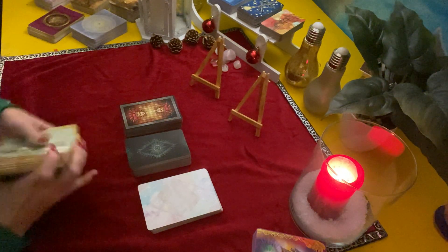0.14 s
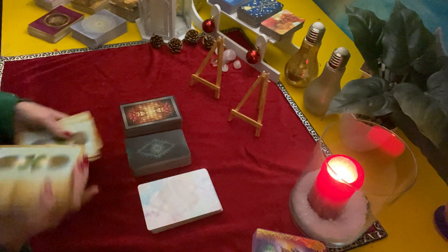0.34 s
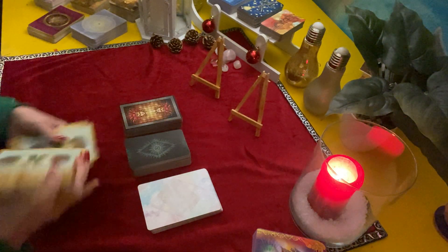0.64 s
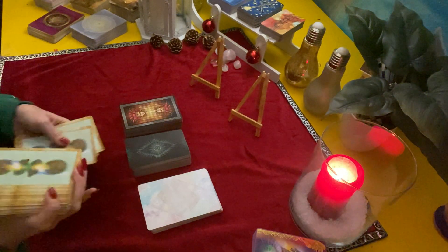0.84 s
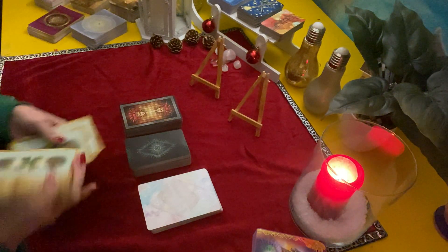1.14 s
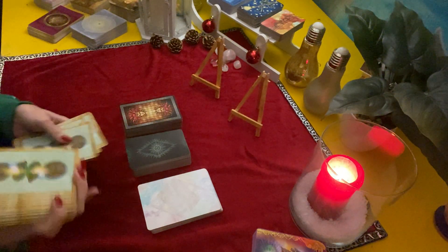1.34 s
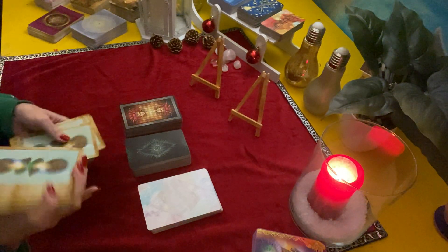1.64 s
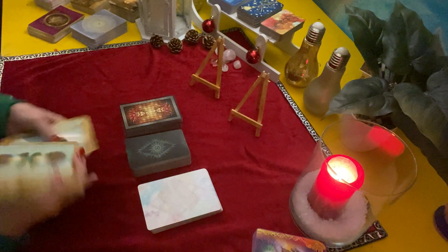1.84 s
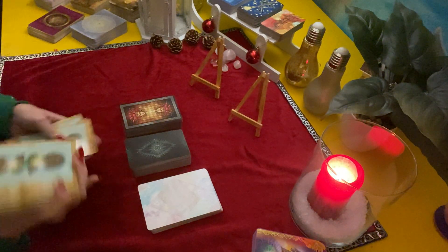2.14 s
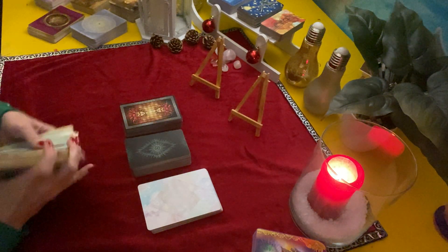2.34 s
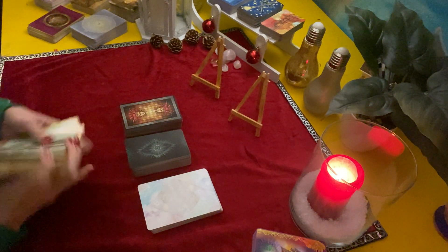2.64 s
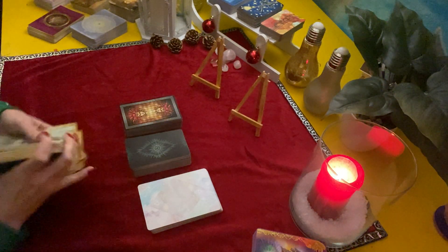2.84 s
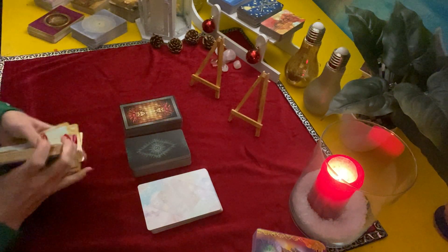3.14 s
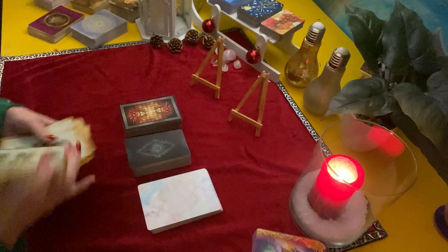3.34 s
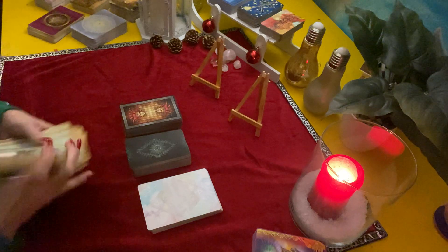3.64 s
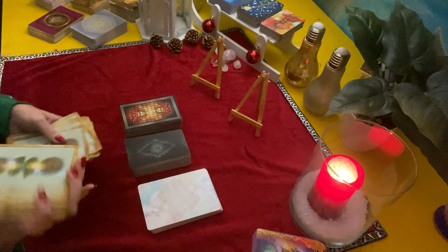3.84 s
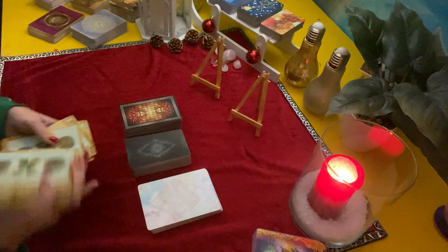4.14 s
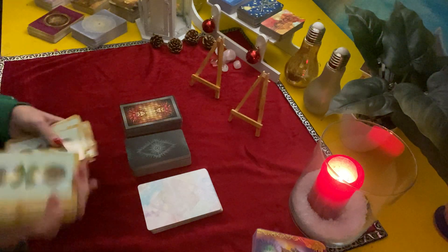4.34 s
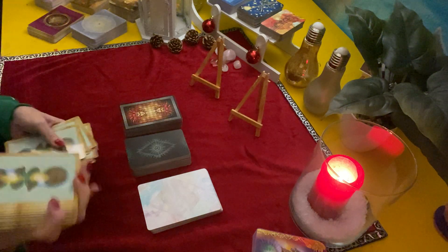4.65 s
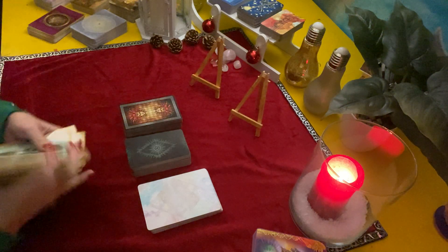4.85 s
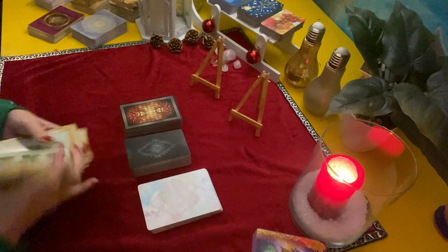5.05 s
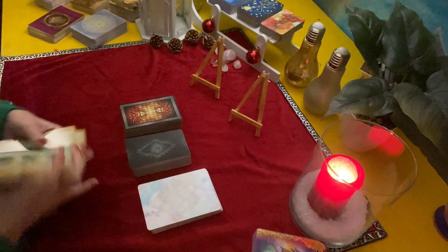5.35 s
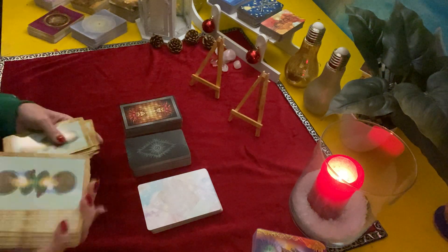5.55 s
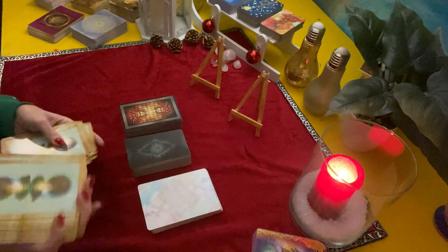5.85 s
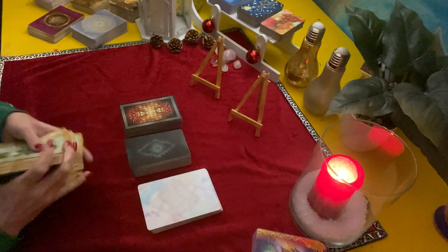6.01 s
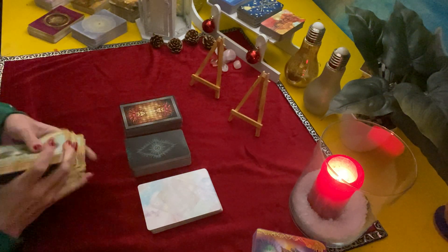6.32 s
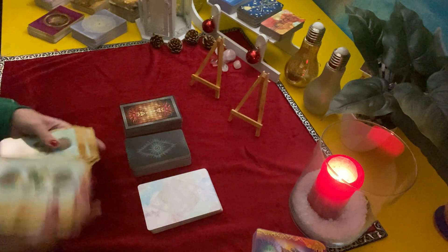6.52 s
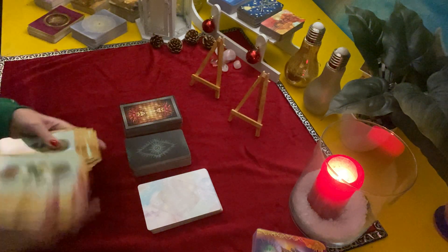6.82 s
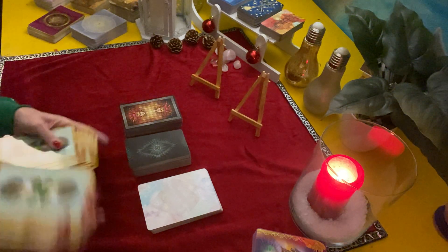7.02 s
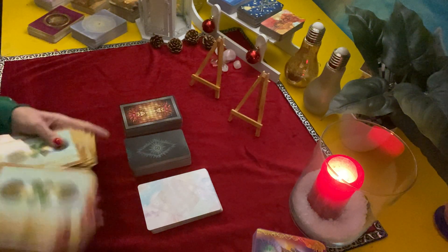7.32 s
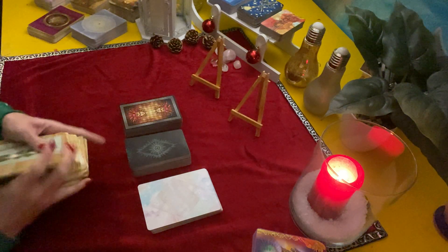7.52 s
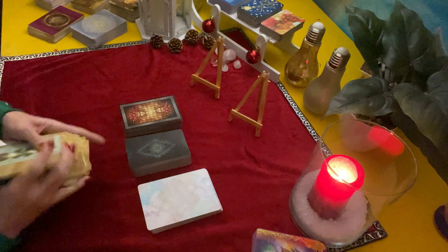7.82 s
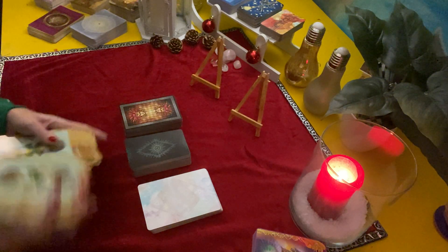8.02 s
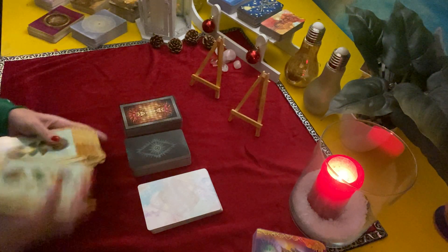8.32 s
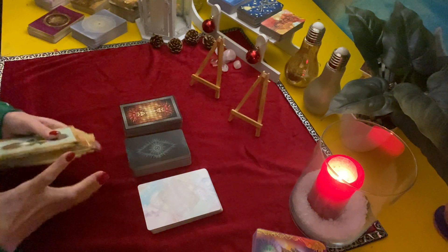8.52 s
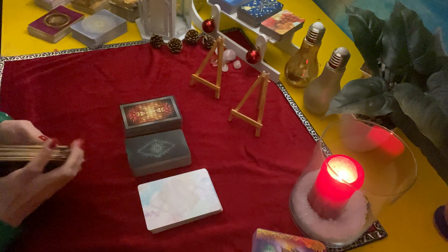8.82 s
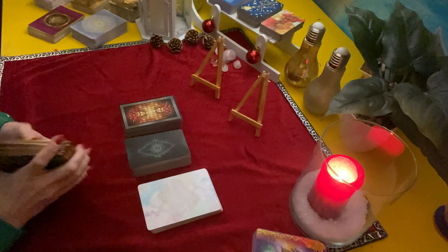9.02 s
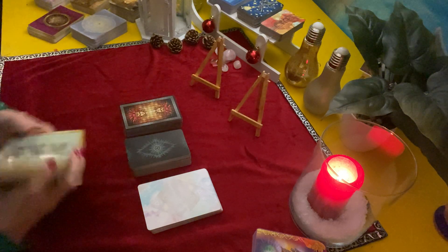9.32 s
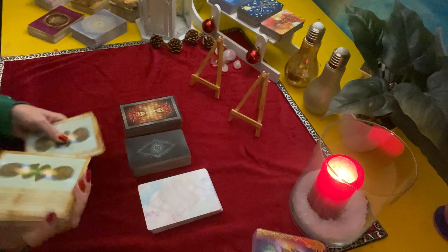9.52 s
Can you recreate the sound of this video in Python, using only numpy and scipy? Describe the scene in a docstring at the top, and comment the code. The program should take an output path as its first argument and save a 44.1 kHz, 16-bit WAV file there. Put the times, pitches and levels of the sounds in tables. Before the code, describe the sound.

From the very start, a deck of cards is shuffled overhand in a steady rhythm of about three and a half strokes a second. In each stroke a packet scrapes free, slides back, hisses in between the other cards and clacks home with a soft, low thump. The sharpest clacks come at around 1.7, 1.8 and 2.5 seconds. The rhythm carries on evenly, the thumps growing lighter from about 5.5 seconds. At around 8.5 seconds the shuffling stops, and fingers square up the deck with a few quiet rubs along its edges. At about 9.2 seconds it resumes with a couple more crisp strokes, lasting to roughly 9.6 seconds. The cards sound close and in stereo, with the short echoes of a small room over a very faint bed of rumble, hiss and electrical hum.

```python
"""A small live room, a cloth-covered table: a deck of cards is shuffled overhand, about three and a half
strokes a second. In each stroke a packet scrapes free, slides back, hisses in between the other cards
and clacks home with a soft, low thump. Near the end fingers square up the deck with a soft rub.
Two microphone ports hear the cards and their echoes over a faint bed of rumble, hiss and mains hum."""
import sys
import numpy as np
from scipy import signal
from scipy.fft import rfft, irfft, next_fast_len
from scipy.io import wavfile
from scipy.ndimage import map_coordinates

SR = 44100
rng = np.random.default_rng(int(sys.argv[2]) if len(sys.argv) > 2 else 0)


def wrap_up_sound(samples):
    """Save the sound to the file named by the first command line argument, as 16-bit audio."""
    columns = np.atleast_2d(samples).T
    # keep every value between -1 and 1, then stretch to whole-number steps
    tamed = np.clip(columns, -1, 1)
    steps = np.round(tamed * 32767).astype(np.int16)
    wavfile.write(sys.argv[1], SR, steps)


N = 426447
T = np.arange(SR // 7) / SR  # seconds within one event

# Colours of the bed. Each row: frequency in Hz, relative level in dB.
RUMBLE_COLOUR = [(20, -22.5), (35, -1.5), (50, 5.5), (70, -20.5), (100, -7), (160, -30.5), (350, -29.5),
                 (1000, -40), (4000, -57.5)]
HISS_COLOUR = [(100, 0.5), (400, -4), (1000, -10.5), (1600, -2.5), (4000, -10.5), (8000, -9.5),
               (12000, -19), (16000, -14.5)]
# The room's decay. Each row: frequency in Hz, seconds to fall by 60 dB.
ROOM_DECAY = [(70, 0.44), (250, 0.26), (700, 0.29), (2000, 0.2544), (3500, 0.25), (6000, 0.29),
              (10000, 0.22), (15000, 0.18)]
# The room's tone. Each row: frequency in Hz, level in dB against the direct sound.
ROOM_COLOUR = [(60, -4), (170, -5.5), (330, -3), (500, -0.5), (900, -0.5), (1500, -8.5), (2400, -5.5),
               (3100, -5.5), (3900, -7.5), (5000, -8.5), (7000, -11), (11000, -7.5), (15000, -15)]
# Echoes off the table and the wall behind the cards. Each row: frequency in Hz, share from 0 to 1.
FRONTAL_SHARE = [(80, 0.7), (300, 0.68), (900, 0), (2000, 0.31), (3700, 0), (8000, 1)]
# The cards reach the left port first. Each row: frequency in Hz, phase lead in radians.
LEFT_LEAD = [(0, 0), (340, .1), (600, 1.0), (1150, .5), (1700, 1.4), (2400, 2.5), (3600, 3.2), (5000, 3.7),
             (6200, 5.3), (8200, 6.4), (10450, 9.4), (13000, 12.6), (15600, 15.7)]
# Moving hands bend the path to the ports. Each row: frequency in Hz, scatter of the lead in radians.
LEAD_SCATTER = [(200, .05), (600, 1.4), (1300, 0.2), (2400, 1.3), (3700, 1.55), (5200, 1.8), (8000, 0.1),
                (15000, .3)]
# The microphone's bass roll-off. Each row: frequency in Hz, gain in dB.
MIC_LOW_CUT = [(20, -15.5), (33, -12.5), (46, 0)]
# Balance of the ports. Each row: frequency in Hz, left minus right in dB.
MIC_BALANCE = [(100, -2), (1500, -1.5), (5000, -.8), (14000, -.1)]

# Colours of paper rubbing on paper. Each row: frequency in Hz, relative level in dB.
SCRAPE_COLOUR = [(60, -27.5), (160, -10), (330, -1), (750, -5.5), (1080, -8), (1600, 3), (2100, -4.5),
                 (3000, -8.5), (5000, -12.5), (15000, -38)]
EDGE_COLOUR = [(800, -38), (2500, 2), (4500, 0.5), (7000, 1), (10000, -4), (15500, -3.5)]
SLIDE_COLOUR = [(150, -13), (450, -5), (1500, 0.5), (3500, 0), (7000, -1.5), (11000, -6.5), (15500, -6)]
SWISH_COLOUR = [(60, -20.5), (150, -12), (500, -2), (1300, -11), (2400, -6), (3800, -9.5), (5500, -2.5),
                (7500, -0.5), (11000, 1), (15500, 6.5)]
SETTLE_COLOUR = [(60, -28.5), (160, -6.5), (380, 1.5), (800, -3), (1500, -1), (3000, -6.5), (6000, -9),
                 (10000, -23.5), (15000, -28.5)]
# Colours of a clack in the stack, faces and edge. Each row: frequency in Hz, relative level in dB.
KNOCK_COLOUR = [(40, -21.5), (130, -11.5), (250, 0), (430, 3), (600, -3.5), (850, 3), (1200, -15),
                (3000, -35)]
CRACK_COLOUR = [(100, -53), (500, -12), (900, -14), (1400, 3.5), (2400, 1), (3600, -6), (6000, -25)]
SNAP_COLOUR = [(300, -43), (1500, -13), (3600, 4.5), (6000, 2), (8500, -0.5), (11000, -5), (15500, -6.5)]
# Fingers square up the deck. Each row: start in seconds, length in seconds, rub in dB, edge hiss in dB.
SQUARING_RUBS = [(8.681, 0.14, -61.5, -58), (8.897, 0.14, -73, -63), (9.11, 0.22, -69.5, -61.5),
                 (9.179, 0.039, -54.5, -49.5)]
# A packet is drawn out. Each row: start in seconds, scrape level in dB, scrape length in seconds.
PACKET_DRAWS = [(0.193, -37, 0.013), (0.47, -37.5, 0.022), (0.744, -43, 0.032), (1.015, -40.5, 0.018),
                (1.29, -44.5, 0.02), (1.557, -43.5, 0.024), (1.812, -44.5, 0.015), (2.093, -46.5, 0.046),
                (2.375, -40, 0.011), (2.643, -37, 0.021), (2.902, -35.5, .032), (3.188, -41.5, 0.025),
                (3.473, -38, 0.031), (3.756, -42, 0.019), (4.021, -37, 0.031), (4.293, -43.5, 0.024),
                (4.567, -45.5, .032), (4.851, -42.5, .035), (5.145, -41, 0.031), (5.446, -44.5, 0.012),
                (5.742, -40.5, 0.038), (6.064, -38.5, 0.018), (6.362, -42.5, 0.038), (6.66, -38.5, .015),
                (6.943, -43, .036), (7.255, -37, 0.023), (7.55, -47, .039), (7.845, -42.5, .035),
                (8.14, -43, .038), (8.431, -42.5, 0.062), (9.391, -37, .031)]
# A packet drops in. Each row: start in seconds, swish in dB, swish length in seconds, rustle in dB.
PACKET_DROPS = [(-0.001, -28.5, 0.016, -31.5), (0.291, -23.5, 0.018, -37), (0.553, -28.5, 0.018, -32),
                (0.837, -25.5, 0.028, -41.5), (1.106, -29, 0.023, -31), (1.38, -22.5, 0.018, -46.5),
                (1.653, -26, .022, -34), (1.918, -25, 0.017, -31), (2.192, -23.5, 0.019, -44),
                (2.468, -26.5, 0.024, -30), (2.761, -24.5, 0.013, -40.5), (3.031, -35, 0.016, -45),
                (3.285, -21, 0.018, -38), (3.566, -26.5, .017, -37.5), (3.851, -26.5, .017, -36.5),
                (4.114, -29, 0.011, -39.5), (4.388, -23.5, 0.011, -35), (4.666, -24, 0.016, -33),
                (4.955, -29, 0.012, -45.5), (5.247, -33, 0.012, -30.5), (5.56, -19, .014, -38.5),
                (5.866, -26, .026, -46.5), (6.169, -32.5, 0.018, -52), (6.462, -32, .013, -43.5),
                (6.771, -20.5, 0.0082, -41.5), (7.065, -27.5, 0.012, -41.5), (7.373, -29.5, 0.013, -42),
                (7.662, -33.5, .018, -39.5), (7.969, -26, 0.011, -42.5), (8.243, -49, .028, -46),
                (9.243, -27, 0.016, -37.5), (9.509, -31.5, .012, -33)]
# The low thump under each drop, easing off until the pause. Each row: time in seconds, level in dB.
THUMP_LEVEL = [(0, -38), (2.3, -40.5), (4.1, -39.5), (5.5, -43), (6.1, -47), (7.4, -43.5), (7.7, -51),
               (8.3, -59), (9.2, -44), (9.6, -34)]
# Cards strike the deck. Each row: start in seconds, strength in dB, ring pitch in Hz, tilt from 0 to 1.
CARD_HITS = [(0.0322, -27, 2250, 0.72), (0.201, -33.5, 1596, .5), (0.307, -37, 655, 0),
             (0.3173, -32.5, 2740, .95), (0.474, -38.5, 1770, 0.6), (0.5734, -31.5, 784, 0.1),
             (0.5833, -37.5, 665, .95), (0.748, -27.5, 1700, 0.3), (0.8762, -31.5, 2650, .95),
             (1.0193, -41.5, 2180, 0.8), (1.1297, -35, 2700, .05), (1.1434, -28.5, 1650, .6),
             (1.4032, -38, 573, .05), (1.4116, -29.5, 2200, 0.8), (1.6862, -20.5, 2006, .6),
             (1.8252, -18.5, 1510, .5), (1.8305, -28, 1430, 0.28), (1.9521, -31.5, 2350, .85),
             (2.1, -39, 1710, 0.7), (2.1059, -35.5, 1730, 0.2), (2.2208, -28.5, 890, 0.42),
             (2.4095, -45.5, 1450, .55), (2.4999, -18.5, 2360, 0.8), (2.6495, -33, 1470, 0.1),
             (2.6716, -31, 1380, .7), (2.7741, -36, 2620, 0.7), (2.7869, -35, 1540, 0.04),
             (2.9079, -28, 1430, .85), (2.9398, -34.5, 1440, 0.5), (3.0421, -36, 2300, .95),
             (3.059, -28, 890, 0.5), (3.2019, -38.5, 1440, 0.6), (3.311, -48, 1150, .95),
             (3.4836, -34, 1440, 0.1), (3.4982, -44, 1460, .95), (3.5838, -39.5, 2280, 0),
             (3.5971, -33, 680, 0.8), (3.7624, -34, 1380, .55), (3.8666, -32.5, 2500, .05),
             (3.8815, -33, 2600, .95), (4.0352, -32, 1470, .65), (4.1307, -31, 2330, .05),
             (4.1437, -33, 2400, .95), (4.3174, -36.5, 2960, 0.7), (4.3953, -34.5, 2280, .95),
             (4.4157, -35, 650, 0.4), (4.5692, -42, 646, .1), (4.6853, -32.5, 615, .05),
             (4.8624, -42, 1460, 0.6), (4.9683, -31.5, 612, .05), (5.264, -35, 2170, 0.16),
             (5.273, -39, 783, .95), (5.4641, -35.5, 1630, .7), (5.566, -50.5, 2430, 0),
             (5.581, -36.5, 686, 0.8), (5.7688, -38.5, 1520, 0.5), (5.9055, -44, 666, .05),
             (6.045, -49, 2490, 1), (6.181, -37, 2600, 0.6), (6.1962, -41.5, 800, .75),
             (6.3738, -35, 1660, 0.6), (6.3886, -36.5, 1470, 0.6), (6.472, -38, 640, 1),
             (6.6691, -32, 1760, .48), (6.9504, -32.5, 1710, 0.6), (7.0804, -45, 640, .95),
             (7.26, -32.5, 1740, .48), (7.411, -40, 2660, .8), (7.5587, -41.5, 2830, 0.8),
             (7.5794, -36.5, 2440, .9), (7.8535, -31.5, 2360, 0.7), (7.8715, -37.5, 1280, .45),
             (8.1457, -49, 1420, 0.7), (8.2772, -46, 1870, 0.7), (8.4372, -34, 1576, .95),
             (8.4686, -35, 1520, .6), (8.68, -56, 1390, 0.4), (9.2548, -30, 920, .25),
             (9.414, -34.5, 1400, 0.7), (9.4527, -39, 1670, 0.4), (9.523, -26.5, 2340, 0.7),
             (9.5275, -33, 2300, 1)]
# A clack's mix, from flat (tilt 0) to corner first (1). Each row: tilt, then ring, knock, crack and
# snap in dB against the hit's strength.
TILT_MIX = [(0, -2.5, -1, -0.5, -12.5), (0.499, 1.5, -10.5, -1, -4), (1, -11, -5, -2, 5.5)]
# Low rings involve the whole stack, which the palm chokes sooner. Each row: pitch in Hz, decay in seconds.
RING_DECAY = [(700, .00074), (1600, .0025), (2600, .00092)]


def amp(db):
    """Decibels to gain."""
    return 10 ** (np.asarray(db) / 20)


def unit(x):
    """Scale to rms 1."""
    return x / np.sqrt(np.mean(x ** 2) + 1e-20)


def along(points, hz):
    """Read a curve on a log frequency axis."""
    freqs, values = np.transpose(points)
    return np.interp(np.log(hz + 1), np.log(freqs + 1), values)


def filtered(x, response):
    """Shape x with a gain that depends on frequency."""
    n = x.shape[-1]
    padded = next_fast_len(n + 1024, True)
    return irfft(rfft(x, padded) * response(np.fft.rfftfreq(padded, 1 / SR)), padded)[..., :n]


def coloured(noise, colour):
    """Give noise a colour, at rms 1."""
    return unit(filtered(noise, lambda hz: amp(along(colour, hz))))


def minimum_phase(colour, size=2048):
    """A filter response for a colour that keeps the attack sharp."""
    cepstrum = irfft(np.log(amp(along(colour, np.fft.rfftfreq(size, 1 / SR)))))
    fold = 1 + np.sign(size // 2 - np.arange(size))
    return np.exp(rfft(cepstrum * fold))


def add(track, start_s, sound):
    """Mix a sound into the track."""
    start = max(round(start_s * SR), 0)
    part = track[start:start + len(sound)]
    part += sound[:len(part)]


def background(rumble_db, hiss_db, hum_db):
    """The bed: low room rumble, faint microphone hiss and a trace of mains hum."""
    rumble = coloured(rng.standard_normal(N), RUMBLE_COLOUR)
    hiss = coloured(rng.standard_normal((2, N)), HISS_COLOUR)
    hum = unit(np.sin(2 * np.pi * 100 * np.arange(N) / SR))
    return amp(rumble_db) * rumble + amp(hiss_db) * hiss + amp(hum_db) * hum


def toward_cards(hz):
    """Phase at the left and right port of a sound from the direction of the cards."""
    lead = np.interp(hz, *np.transpose(LEFT_LEAD))
    return np.exp(1j * lead * np.array([[.5], [-.5]]))


def room_tail():
    """A short stereo tail: some echoes come from the cards' direction, the rest are diffuse."""
    hz, t, tails = signal.stft(rng.standard_normal((3, SR // 3)), SR, nperseg=256)
    tails = tails * amp(-60 * t / along(ROOM_DECAY, hz)[:, None]) * (1 - np.exp(-t / .0003))
    tails /= np.sqrt(np.mean(abs(tails) ** 2, axis=(0, 2)))[:, None]  # equal energy in every band
    diffuse, frontal = tails[:2], tails[2]
    share = along(FRONTAL_SHARE, hz)[:, None]
    pair = diffuse * np.sqrt(1 - share) + frontal * np.sqrt(share) * toward_cards(hz)[..., None]
    pair *= amp(along(ROOM_COLOUR, hz))[:, None]
    return signal.istft(pair, nperseg=256)[1] / np.linalg.norm(signal.istft(frontal, nperseg=256)[1])


def room_echoes(cards, patterns=24):
    """The hands keep moving, so the pattern of echoes changes as they go."""
    out = np.zeros((2, N))
    for span in np.array_split(np.arange(N), patterns):
        echoes = signal.fftconvolve(cards[span][None], room_tail(), axes=1)
        for port, echo in zip(out, echoes):
            add(port, span[0] / SR, echo)
    return out


def direct_path(cards, grain_hz=1500, grain_s=.06):
    """The straight path to the ports; the stereo image wavers as the hands move around the cards."""
    hz, t, spectrum = signal.stft(cards, SR, nperseg=512)
    grid = np.meshgrid(hz / grain_hz, t / grain_s, indexing="ij")
    drift = map_coordinates(rng.standard_normal((64, 512)), grid, mode="mirror")
    waver = np.exp(.5j * along(LEAD_SCATTER, hz)[:, None] * drift)
    ports = toward_cards(hz)[..., None] * np.array([waver, waver.conj()])
    return signal.istft(spectrum * ports, nperseg=512)[1][:, :N]


def friction(colour, grain_db, rate_hz, size=len(T)):
    """Paper sticks and slips: grainy noise whose level takes a new value rate_hz times a second."""
    samples = np.arange(size)
    grip = np.interp(samples * rate_hz / SR, samples, rng.standard_normal(size))
    return coloured(rng.standard_normal(size) * amp(grain_db * grip), colour)


def stroke(length_s, rise_s, release_s, t=T):
    """Envelope of a contact that builds up, holds and lets go."""
    return (1 - np.exp(-(t / rise_s) ** 2)) * np.exp(-np.maximum(t - length_s, 0) / release_s)


def thump(start_hz, end_hz, glide_s, swell_s):
    """A soft, low thump with each stroke, sinking in pitch and uneven from stroke to stroke."""
    waver = np.interp(T, np.linspace(0, T[-1], 30), rng.normal(0, .25, 30))
    hz = (end_hz + (start_hz - end_hz) * np.exp(-T / glide_s)) * np.exp(waver)
    age = T / (swell_s * np.exp(rng.normal(0, .32)))
    swell = age * np.exp((1 - age ** 3) / 3)  # peaks at age 1
    return np.sin(2 * np.pi * (np.cumsum(hz) / SR + rng.random())) * swell


def unit_hit(x, contact_s=.006):
    """Give a hit the energy of rms 1 held for one contact."""
    return x / np.sqrt(np.sum(x ** 2) / (contact_s * SR))


def burst(response, impact_db, chatter_s, rattle_db, rattle_s, size=2048):
    """One sharp impact and a brief chatter, then the weaker rattle of neighbouring cards."""
    t = T[:size]
    envelope = np.exp(-t / chatter_s) + amp(rattle_db) * np.exp(-t / rattle_s)
    force = rng.choice([-1, 1], size) * envelope
    return unit_hit(irfft((amp(impact_db) + rfft(force)) * response))


def deck_squaring():
    """Fingers rub the edges of the deck straight, catching on single cards."""
    out = np.zeros(N)
    t = np.arange(SR // 4) / SR
    for start, length, rub_db, hiss_db in SQUARING_RUBS:
        rub = amp(rub_db) * friction(SCRAPE_COLOUR, grain_db=9.5, rate_hz=230, size=len(t))
        hiss = amp(hiss_db) * friction(EDGE_COLOUR, grain_db=1.5, rate_hz=200, size=len(t))
        add(out, start, (rub + hiss) * stroke(length, rise_s=.018, release_s=.022, t=t))
    return out


def packet_draws(edge_db=-3.5, thump_db=-8, slide_db=-52, longest_slide_s=.12):
    """A packet's edges scrape free with a low thump, and its face glides back over the deck."""
    out = np.zeros(N)
    drop_times = np.array(PACKET_DROPS)[:, 0]
    for start, scrape_db, length in PACKET_DRAWS:
        scrape = friction(SCRAPE_COLOUR, grain_db=5, rate_hz=350)
        edge = amp(edge_db) * friction(EDGE_COLOUR, grain_db=5.5, rate_hz=310)
        pull = stroke(length + .005, rise_s=.0049, release_s=.0074)
        add(out, start - .003, amp(scrape_db) * (scrape + edge) * pull)
        next_drop = drop_times[np.argmax(drop_times > start)]
        travel_s = min(next_drop - start, longest_slide_s)
        slide = amp(slide_db) * friction(SLIDE_COLOUR, grain_db=4, rate_hz=250)
        add(out, start, slide * stroke(travel_s, rise_s=.0037, release_s=.0049))
        low_end = thump(start_hz=232, end_hz=62.7, glide_s=.016, swell_s=.027)
        add(out, start, amp(scrape_db + thump_db) * low_end)
    return out


def packet_drops():
    """The packet hisses in between the cards, then settles with a rustle and a low thump."""
    out = np.zeros(N)
    for start, swish_db, length, rustle_db in PACKET_DROPS:
        swish = amp(swish_db) * friction(SWISH_COLOUR, grain_db=4.8, rate_hz=680)
        add(out, start - .0005, swish * stroke(length - .002, rise_s=.0039, release_s=.0026))
        seated = start + length
        rustle = amp(rustle_db) * friction(SETTLE_COLOUR, grain_db=9, rate_hz=350)
        add(out, seated - .004, rustle * stroke(.016, rise_s=.0042, release_s=.008))
        thump_db = np.interp(start, *np.transpose(THUMP_LEVEL))
        add(out, seated, amp(thump_db) * thump(start_hz=243.2, end_hz=50.7, glide_s=.016, swell_s=.024))
    return out


def card_clacks(hard_db=-27.5):
    """Each hit rings the bent cards, knocks the stack, cracks across the faces and snaps at the edge."""
    out = np.zeros(N)
    stack, faces, edge = map(minimum_phase, (KNOCK_COLOUR, CRACK_COLOUR, SNAP_COLOUR))
    t = T[:SR // 40]
    tilts, *layers_db = np.transpose(TILT_MIX)
    for start, strength_db, ring_hz, tilt in CARD_HITS:
        ring_db, knock_db, crack_db, snap_db = (strength_db + np.interp(tilt, tilts, db) for db in layers_db)
        knock_db -= max(strength_db - hard_db, 0)  # harder hits are too brief to move the stack further
        ring = unit_hit(np.sin(2 * np.pi * ring_hz * t) * np.exp(-t / along(RING_DECAY, ring_hz)))
        knock = burst(stack, impact_db=12, chatter_s=.00023, rattle_db=-11, rattle_s=.0065)
        crack = burst(faces, impact_db=10.5, chatter_s=.00064, rattle_db=-8, rattle_s=.0056)
        snap = burst(edge, impact_db=7, chatter_s=.001, rattle_db=-13.5, rattle_s=.0073)
        add(out, start, amp(ring_db) * ring)
        add(out, start, amp(knock_db) * knock + amp(crack_db) * crack)
        add(out, start - .0003, amp(snap_db) * snap)
    return out


def scene():
    """The cards reach the two ports directly and by way of the room, over the quiet bed."""
    cards = packet_draws() + packet_drops() + card_clacks() + deck_squaring()
    return direct_path(cards) + room_echoes(cards) + background(rumble_db=-68, hiss_db=-73, hum_db=-73)


def record(dry):
    """The microphone rounds the highest peaks, drops the deepest bass and very top, and leans right."""
    def response(hz, top_hz=15800):
        balance_db = along(MIC_BALANCE, hz) * np.array([[.5], [-.5]])
        return amp(along(MIC_LOW_CUT, hz) + balance_db) * (hz < top_hz)

    rounded = dry / (1 + (dry / .8) ** 4) ** .25
    return filtered(rounded, response)


dry = scene()
out = record(dry)
wrap_up_sound(out)
```